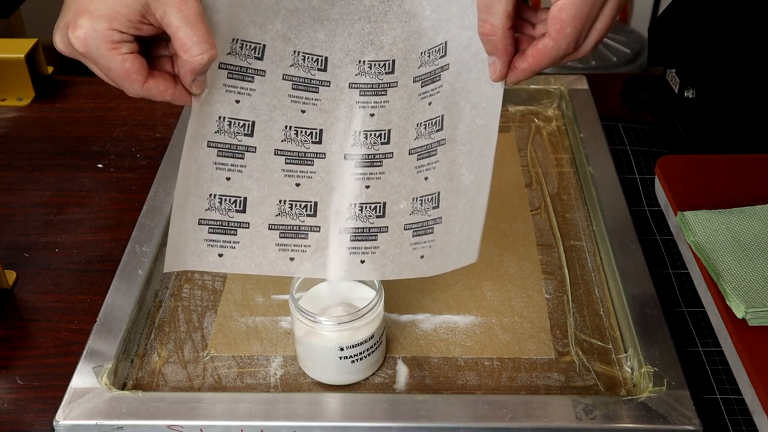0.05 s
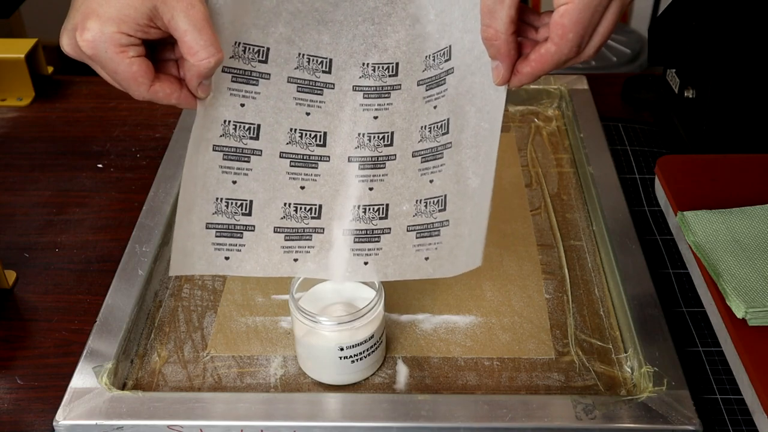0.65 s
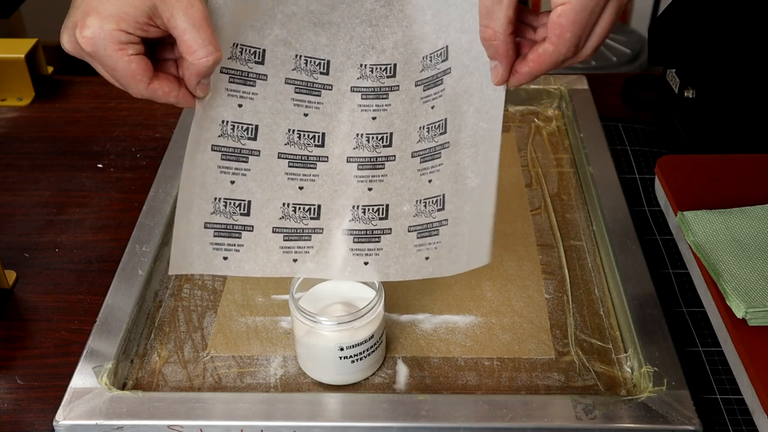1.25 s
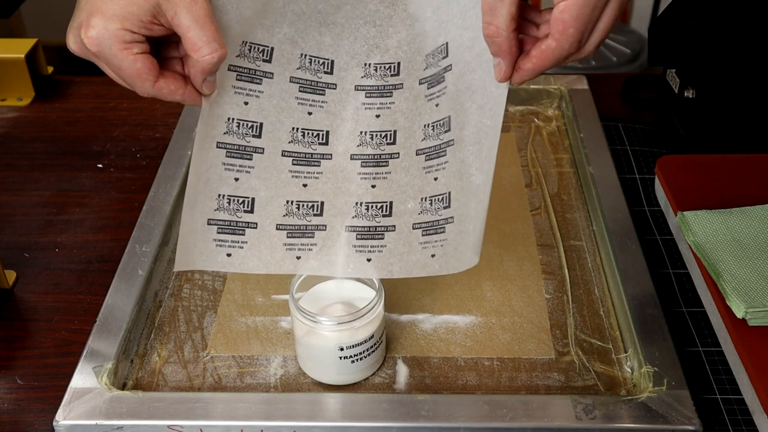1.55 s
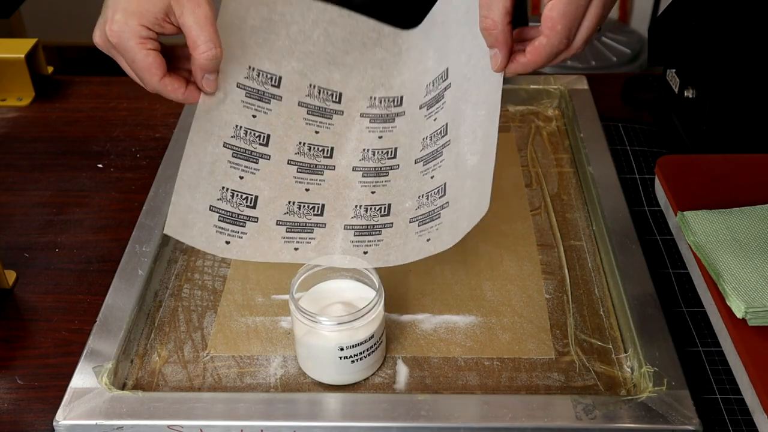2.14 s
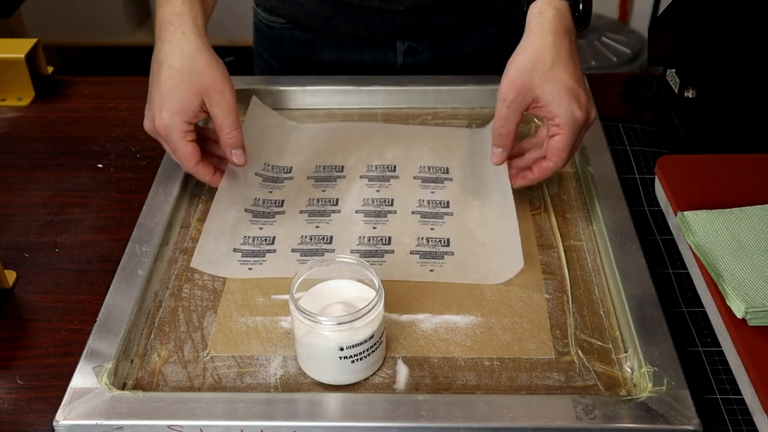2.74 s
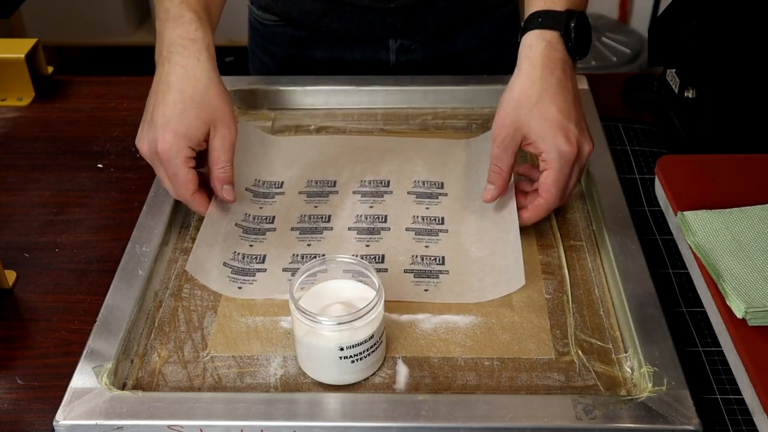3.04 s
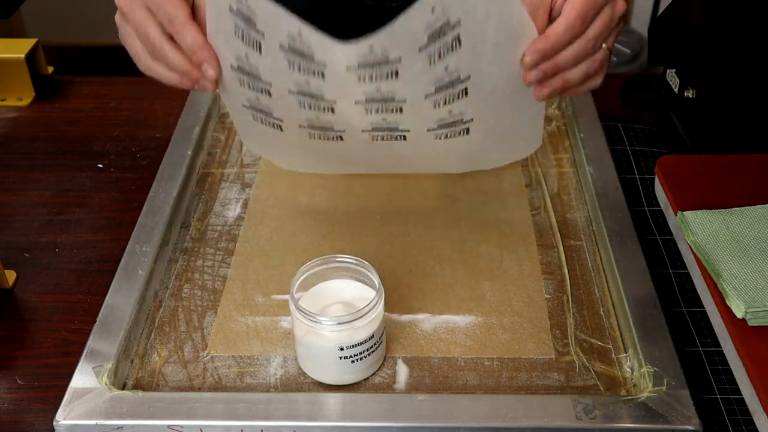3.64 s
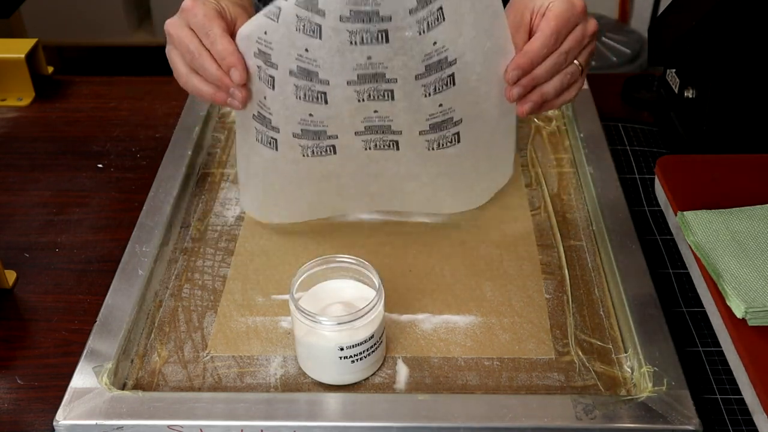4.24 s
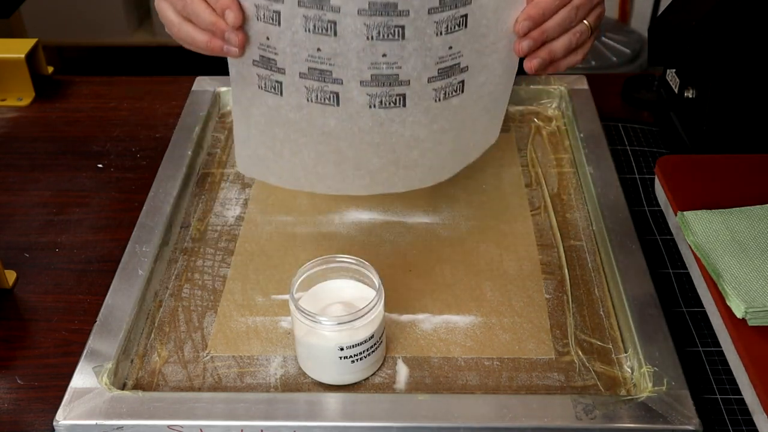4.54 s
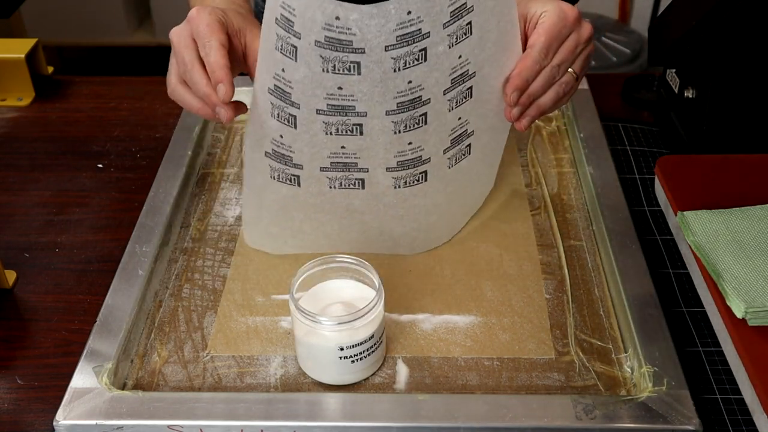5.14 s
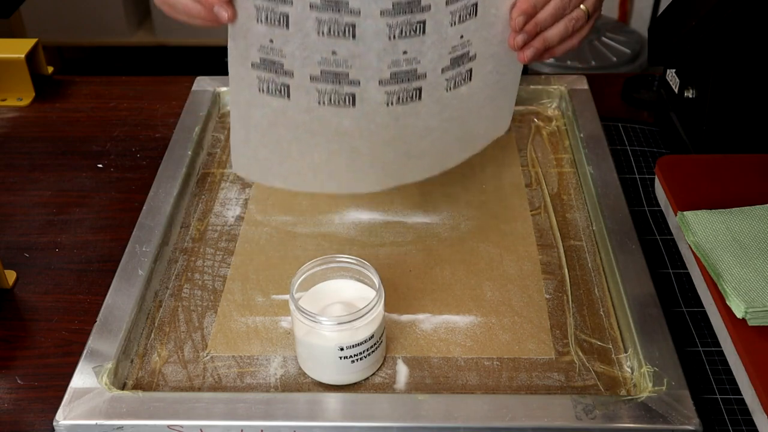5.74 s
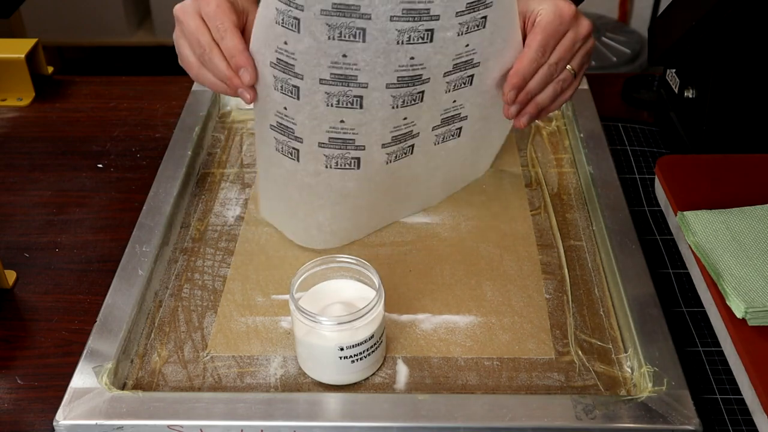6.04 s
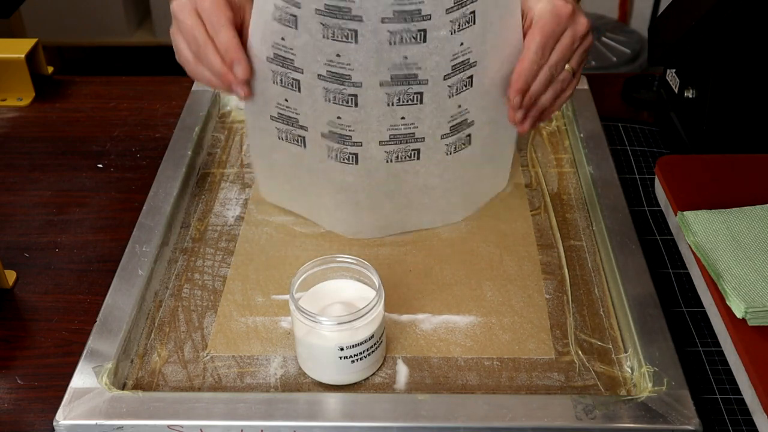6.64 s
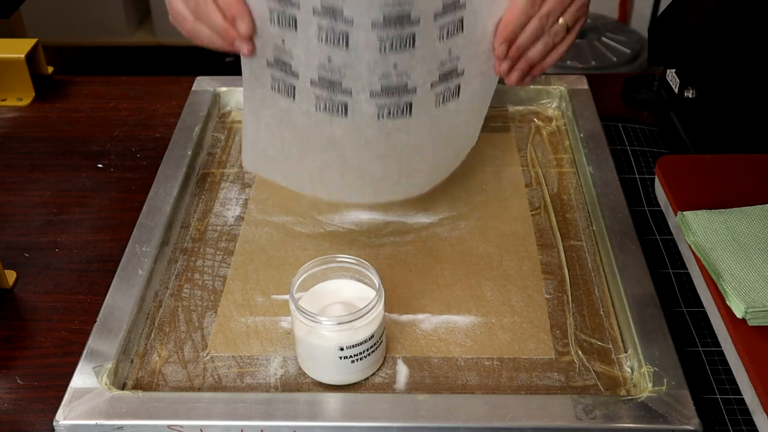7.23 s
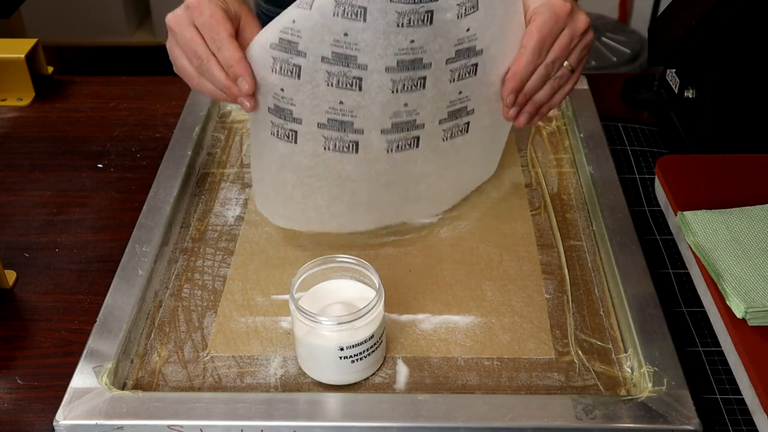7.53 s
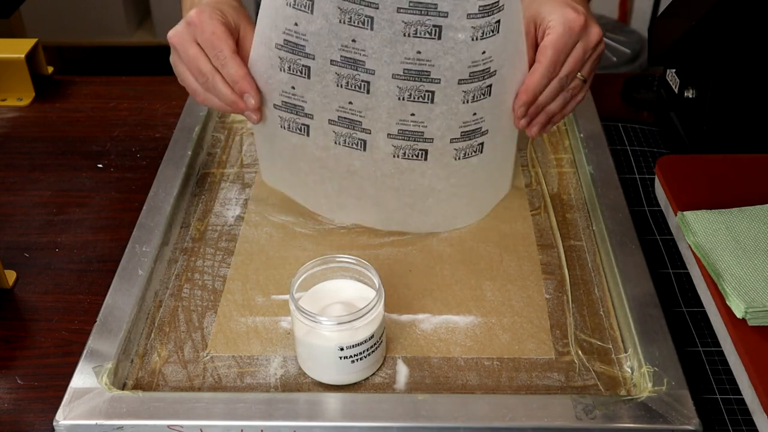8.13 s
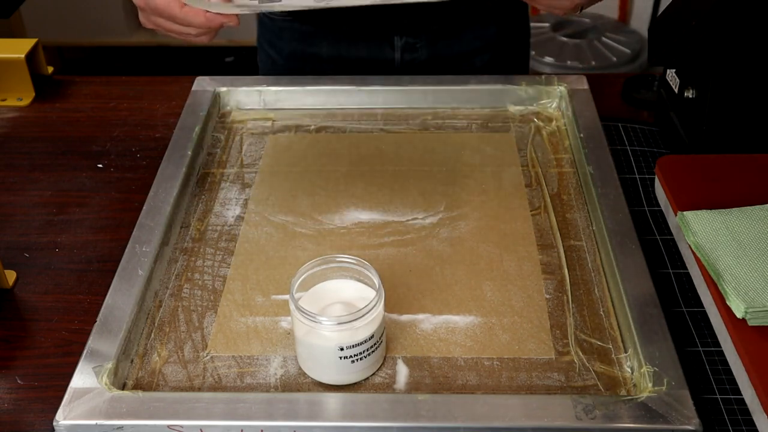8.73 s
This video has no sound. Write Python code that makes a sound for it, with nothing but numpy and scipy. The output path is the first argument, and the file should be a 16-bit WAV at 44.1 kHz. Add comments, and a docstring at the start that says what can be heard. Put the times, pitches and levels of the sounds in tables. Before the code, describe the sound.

A stiff sheet of paper is jiggled rapidly, making soft flutters and small ticks. It settles into quiet rustling and crinkling, with a faint hiss of powder sliding across it. Then the sheet is snapped taut six times, each a sharp crack with a springy flap after it, and a light rustle finishes. The sound is close and nearly mono in a small, quiet room.

```python
"""Shaking powder off paper

A stiff sheet is jiggled over a plastic jar in a small workroom, heard close and nearly mono. It is
lowered, the last powder hisses across it, and it is snapped taut six times to shake it clean.
Buckling makes the flaps, ticks and cracks, sliding friction the hiss; the room answers each snap."""
import sys
import numpy as np
from scipy import signal
from scipy.io import wavfile
from scipy.ndimage import uniform_filter1d

SR = 44100
rng = np.random.default_rng(int(sys.argv[2]) if len(sys.argv) > 2 else 0)


def wav_out(sig):
    """Save sig, one row per channel (or a flat mono array), as 16-bit PCM at SR to the path in sys.argv[1]."""
    wavfile.write(sys.argv[1], SR, np.round(np.clip(np.atleast_2d(sig).T, -1, 1) * 32767).astype(np.int16))


N = 391604
TIME = np.arange(N) / SR


def amp(db):
    """Decibels to amplitude ratio."""
    return 10 ** (np.asarray(db) / 20)


def unit(x):
    """Normalisation to rms 1."""
    return x / np.sqrt(np.mean(x ** 2) + 1e-20)


def read(points, hz):
    """Interpolation on a log-frequency axis."""
    f, value = np.transpose(points)
    return np.interp(np.log(hz + 1), np.log(f + 1), value)


def follow(curve):
    """Amplitude envelope from (time_s, level_db) points, silent outside them."""
    s, db = np.transpose(curve)
    return amp(np.interp(TIME, s, db)) * (TIME >= s[0]) * (TIME <= s[-1])


def add(mix, start_s, sound):
    """Superposition of a sound on the mix."""
    part = mix[max(round(start_s * SR), 0):][:len(sound)]
    part += sound[:len(part)]


def coloured(x, colour, tilt=None, size=4096):
    """Minimum-phase filtering by a spectrum of unit energy, times an optional tilt."""
    hz = abs(np.fft.fftfreq(size, 1 / SR))
    gain = unit(amp(np.maximum(read(colour, hz), -90)))
    if tilt is not None:
        gain = gain * amp(read(tilt, hz))
    log_response = np.conj(signal.hilbert(np.log(gain)))
    taps = np.fft.ifft(np.exp(log_response)).real
    return signal.oaconvolve(x, taps[:size // 2])[:len(x)]


def crispness(db):
    """Spectral tilt: the tighter a buckle, the more its highest frequencies gain."""
    return [(2600, 0.02), (7500, db), (12000, 2.27 * db)]


def crackle(size, per_s, spread_db, smooth):
    """Shot noise: random impulses of uneven size over a share of smooth friction noise, rms 1."""
    sizes = amp(spread_db * np.minimum(rng.exponential(1, size), 4))
    clicks = sizes * rng.choice([-1, 1], size) * (rng.random(size) < per_s / SR)
    return unit(unit(clicks) + smooth * rng.standard_normal(size))


def wander(per_s):
    """Random modulation, rms 1."""
    knots = np.arange(0, TIME[-1] + 1, 1 / max(per_s, 1))
    return unit(np.interp(TIME, knots, rng.standard_normal(N)[:len(knots)]))


def swell(rise_s, t60_s, size=18000):
    """Damped transient: a smooth rise and an exponential decay."""
    t = np.arange(size) / SR
    return (1 - np.exp(-(t / rise_s) ** 2)) * amp(-60 * t / max(t60_s, .003))


# Spectrum of the slack sheet: frequency_hz, gain_db
FLAP_SPECTRUM = [(70, -38), (150, -20.5), (300, -5.5), (500, -5.5), (700, -2.5), (1000, -8), (2000, -0.5),
                 (3200, -2.5), (5200, -7.5), (8500, -17.5), (10500, -29), (15500, -39.5)]
def flap(treble_db, t60_s, rise_s):
    """Buckling: the slack sheet flips over in a short, soft shower of impulses."""
    shape = swell(rise_s, t60_s)
    shower = shape * crackle(len(shape), per_s=2000, spread_db=2.5, smooth=0.76)
    return coloured(shower, FLAP_SPECTRUM, crispness(treble_db + 17))


# Bouts of shaking: start_s, end_s, period_s
JIGGLE_BOUTS = [(-.002, .85, .112), (.897, 1.75, .1184)]
# The three flips in a stroke: delay_s, gain_db, treble_db
STROKE_FLIPS = [(0.001, 0, -27), (.033, -3.5, -26), (.057, -2.5, -27)]
# Strength of the shaking: time_s, level_db
JIGGLE_EFFORT = [(0, -45), (.12, -35.5), (.25, -32.5), (.41, -39.5), (.52, -32.5), (.66, -38.5), (.92, -34),
                 (1.15, -36), (1.42, -37.5), (1.6, -33), (1.76, -39.5), (1.97, -44.5)]
def jiggling(gain_db=-2, uneven_db=0.8, lead_s=.003):
    """Forced vibration: the hands drive the sheet about nine times a second, flipping it in a pattern."""
    out = np.zeros(N)
    for stroke_s in np.concatenate([np.arange(*bout) for bout in JIGGLE_BOUTS]):
        for delay_s, flip_db, treble_db in STROKE_FLIPS:
            s = stroke_s + delay_s
            effort_db = np.interp(s, *np.transpose(JIGGLE_EFFORT))
            db = effort_db + flip_db - uneven_db * rng.standard_normal()
            add(out, s - lead_s, amp(db + gain_db) * flap(treble_db, t60_s=0.061, rise_s=0.0042))
    return out


# Slow bends of the sheet: centre_s, length_s, rustle_db, wobble_db, ticks_db
SLOW_BENDS = [(2.327, 0.25, -61, -74, -72), (2.953, 0.14, -60, -61, -85), (3.5, 0.21, -61, -55.5, -80),
              (3.798, 0.58, -66, -64, -93), (4.425, 0.28, -58.5, -55, -80), (5.07, 0.42, -60, -60.5, -61.5),
              (5.512, 0.19, -68, -52.5, -64), (5.997, 0.053, -57.5, -55, -53.5),
              (7.224, 0.14, -55.5, -55, -65.5), (8.19, 0.4, -54.5, -58.5, -57),
              (8.608, 0.15, -53, -61, -59.5), (8.782, 0.41, -63, -69, -78)]
def motion(bend_levels, jiggle_db, billow_db, held_db):
    """Incoherent sum: jiggling, holding, billowing after snaps and bending add in power to one gain."""
    power = (amp(jiggle_db) * follow(JIGGLE_EFFORT)) ** 2 + amp(held_db) ** 2
    billow = swell(rise_s=0.11, t60_s=0.62, size=SR)
    for s, *_ in TAUT_SNAPS:
        add(power, s, (amp(billow_db) * billow / billow.max()) ** 2)
    for (s, length_s, *_), db in zip(SLOW_BENDS, bend_levels):
        power += (amp(db) * np.exp(-(2 * (TIME - s) / length_s) ** 2)) ** 2
    return np.sqrt(power)


# Spectrum of bending paper: frequency_hz, gain_db
RUSTLE_SPECTRUM = [(80, -28), (150, -26.5), (300, -1.5), (450, -2), (700, 9.5), (1000, 4), (1400, 11.5),
                   (2000, 7.5), (3200, 1), (5000, -10.5), (8500, -37.5), (11000, -41), (16000, -52.5)]
def rustle(gain_db=-4, flutter_db=2):
    """Fine buckling and friction: a clumped crackle while the sheet bends."""
    grains = crackle(N, per_s=1200, spread_db=3, smooth=0.93) * amp(flutter_db * wander(per_s=54))
    drive = motion([db for _, _, db, _, _ in SLOW_BENDS], jiggle_db=-17, billow_db=-48, held_db=-69)
    return amp(gain_db) * drive * coloured(unit(grains), RUSTLE_SPECTRUM)


# Spectrum of the bowing sheet: frequency_hz, gain_db
FLEX_SPECTRUM = [(70, -22), (150, -12), (230, -1.5), (330, 6.5), (480, -9.5), (700, -1), (1200, -20),
                 (3000, -47), (16000, -70)]
def flexing(gain_db=-6, wobble_db=2.5):
    """Flexural radiation: the whole sheet bows and stirs the air with a soft, hollow wobble."""
    wobble = amp(gain_db + wobble_db * wander(per_s=55))
    drive = motion([db for *_, db, _ in SLOW_BENDS], jiggle_db=-24.5, billow_db=-52, held_db=-81.5)
    return drive * wobble * coloured(rng.standard_normal(N), FLEX_SPECTRUM)


# Spectrum of a crease: frequency_hz, gain_db
CREASE_SPECTRUM = [(150, -36), (500, -4), (1200, 1), (2200, 4.5), (2800, 5), (3500, 5), (4600, 2),
                   (6000, 0), (9000, -3), (10500, -18), (15500, -25)]
def crinkle(gain_db=-5):
    """Impulse excitation: small creases tick and ring briefly as the fingers work the sheet."""
    clicks = crackle(N, per_s=180, spread_db=10, smooth=0)
    ringing = signal.oaconvolve(abs(clicks), swell(rise_s=0.00027, t60_s=0.014, size=1500))[:N]
    ticks = unit(ringing * rng.standard_normal(N))
    drive = motion([db for *_, db in SLOW_BENDS], jiggle_db=-39, billow_db=-66, held_db=-88)
    return amp(gain_db) * drive * coloured(ticks, CREASE_SPECTRUM)


# The last powder crossing the sheet: time_s, level_db
POWDER_SLIDE = [(2.62, -99), (2.72, -61), (2.78, -63), (2.85, -69), (2.95, -67.5), (3.06, -70), (3.16, -77),
                (3.29, -80), (3.39, -68), (3.5, -90)]
# Spectrum of skidding grains: frequency_hz, gain_db
POWDER_SPECTRUM = [(500, -35), (1500, -14), (3500, 15), (6000, 10), (7500, 5), (9000, 6), (10500, -5),
                   (14000, -3), (16000, -19)]
def powder(gain_db=-4, trickle_db=-47):
    """Sliding friction: grains trickle while the sheet is jiggled and hiss when it is laid flat."""
    grains = crackle(N, per_s=5000, spread_db=3, smooth=.8)
    flow = follow(POWDER_SLIDE) + amp(trickle_db) * follow(JIGGLE_EFFORT)
    return amp(gain_db) * flow * coloured(grains, POWDER_SPECTRUM)


# Spectra of room air and of rumble: frequency_hz, gain_db
AIR_SPECTRUM = [(50, -21.5), (125, -7.5), (200, 1), (300, 3), (500, -2.5), (750, -2.5), (1100, -7.5),
                (1700, -13), (3000, -19.5), (5000, -28), (8000, -36.5), (15500, -35)]
RUMBLE_SPECTRUM = [(10, -9.5), (26, -0.5), (48, -15.5), (70, -20), (110, -29.5), (300, -25), (1000, -36.5),
                   (4000, -52), (16000, -68)]
def background(air_db=-67.5, rumble_db=-62, side_db=-4, drift_db=3):
    """Ambient noise: soft air in the middle, and a drifting rumble partly coherent between the ears."""
    air = amp(air_db) * coloured(rng.standard_normal(N), AIR_SPECTRUM)
    mid, side = (coloured(rng.standard_normal(N), RUMBLE_SPECTRUM, size=16384) for _ in range(2))
    rumble = mid + amp(side_db) * np.array([side, -side])
    return air + amp(rumble_db + drift_db * wander(per_s=3.7)) * rumble


# Flips of the slack sheet: start_s, level_db, treble_db, t60_s
SINGLE_FLAPS = [(.053, -36.5, -27, 0.05), (.222, -35.5, -18, 0.04), (.483, -36.5, -22, 0.072),
                (.734, -41, -21, 0.073), (1.02, -43, -40, 0.17), (1.327, -38, -31, 0.1),
                (1.365, -38, -24, 0.1), (1.378, -30, -18.5, 0.042), (1.518, -39, -21, .1),
                (1.606, -35.5, -19, 0.1), (1.725, -33.5, -18.5, 0.059), (3.491, -37.5, -29, 0.06),
                (4.114, -25.5, -13, 0.083), (4.453, -54, -61, 0.041), (4.939, -35, -19, 0.044),
                (5.045, -50, -20, 0.15), (5.433, -32, -15, 0.05), (5.503, -40, -30, 0.099),
                (6.303, -34, -20, 0.038), (6.918, -37.5, -34, 0.18), (6.949, -39, -19.5, 0.093),
                (7.19, -34.5, -30, 0.051), (7.214, -35.5, -30, 0.065), (7.698, -45, -33, 0.071),
                (8.123, -26.5, -39, 0.038), (8.294, -39, -33, 0.089), (8.545, -56, -12, 0.047),
                (8.617, -43, -22, 0.15)]
def flaps(gain_db=-2, lead_s=.003):
    """Buckling transients: the sheet flips as it is swung and gripped."""
    out = np.zeros(N)
    for s, db, treble_db, t60_s in SINGLE_FLAPS:
        add(out, s - lead_s, amp(db + gain_db) * flap(treble_db, t60_s, rise_s=0.0046))
    return out


# Single creases giving way: start_s, level_db, treble_db
CREASE_POPS = [(.1125, -42.5, -12.5), (0.5604, -39, -18), (.678, -41.5, -27.5), (1.484, -38.5, -35),
               (1.966, -48.5, -10.5), (2.174, -51.5, -25), (2.2424, -50, -17.5), (2.3034, -53, -24),
               (2.3486, -49, -29), (2.758, -45.5, -13.5), (2.7693, -50, -7), (2.778, -46, -10.5),
               (2.795, -47.5, -12), (3.142, -41.5, -17), (3.1567, -41.5, -14), (3.1709, -47, -11),
               (3.2133, -45.5, -10.5), (3.3323, -59.5, -5), (3.4218, -61.5, -6.5), (4.2556, -41, -8),
               (4.3165, -47, -8), (4.4101, -45, -14.5), (4.43, -36, -13), (4.619, -48, -21),
               (4.655, -49, -23), (4.9602, -46.5, -6), (5.152, -56, -8), (5.1962, -53, -19),
               (5.393, -47, -24), (5.5196, -44.5, -14.5), (5.5835, -38, -16.5), (6.1997, -39, -7.5),
               (7.314, -45.5, -22), (8.3637, -50, -22), (8.7188, -47, -25)]
def creases(gain_db=3, click_db=12, lead_s=0.00026):
    """Snap-through instability: one buckle pops with a sharp click and rings briefly in the paper."""
    out = np.zeros(N)
    shape = swell(rise_s=0.0012, t60_s=0.022, size=3000)
    for s, db, treble_db in CREASE_POPS:
        pop = shape * rng.standard_normal(len(shape))
        pop[shape.argmax()] += amp(click_db)
        pop = coloured(pop, CREASE_SPECTRUM, crispness(treble_db + 10))
        add(out, s - lead_s, amp(db + gain_db) * pop)
    return out


# Pushes of air: centre_s, peak_db, pitch_hz, length_s, left_minus_right_db
AIR_PUSHES = [(0.746, -54, 44.7, 0.038, -5), (2.487, -59, 45, .029, 0), (4.09, -52.5, 116, .11, -10),
              (5.993, -49, 40, 0.052, 0), (6.714, -51, 114, 0.12, 0), (7.365, -43, 160, 0.066, 1),
              (7.383, -55, 103, 0.15, 0), (7.387, -49, 45, .09, -6), (7.837, -44, 44.6, 0.068, -11)]
def gusts():
    """Near-field pressure: the swinging sheet pushes slow pulses of air, some harder to one side."""
    out = np.zeros((2, N))
    for s, db, hz, length_s, pan_db in AIR_PUSHES:
        t = np.arange(-length_s / 2, length_s / 2, 1 / SR)
        pulse = np.hanning(len(t)) * np.cos(2 * np.pi * hz * t)
        for channel, side_db in zip(out, (pan_db / 2, -pan_db / 2)):
            add(channel, s - length_s / 2, amp(db + side_db) * pulse)
    return out


# Spectrum of the taut sheet: frequency_hz, gain_db
SNAP_SPECTRUM = [(41, -34.5), (70, -20), (135, 0), (213, 1), (300, 4.5), (462, -10), (711, -0.5),
                 (934, -1.5), (1120, 1), (1470, -0.5), (2660, -2), (8470, -7), (10600, -15), (13300, -16),
                 (16000, -27)]
def whip_crack(crack_db, sizzle_db, thump_db, t60_s):
    """Travelling wave: a whip down the sheet sets off dense buckles, and it thumps like a membrane."""
    shape = swell(0.0034, t60_s) + amp(3) * swell(0.0038, t60_s=0.036)  # the crack leads
    shower = shape * crackle(len(shape), per_s=6700, spread_db=-0.5, smooth=1.16)
    dull = signal.filtfilt(*signal.butter(2, 4500, fs=SR), shower)
    fine = (shower - dull) * swell(rise_s=0.0094, t60_s=1.0)  # the finest buckles build up later
    tilt = [(180, thump_db + 20), (450, 0.0074), (1100, 0.0011),
            (2200, crack_db + 11), (4000, crack_db + 11), (9000, sizzle_db + 13)]
    return coloured(dull + fine, SNAP_SPECTRUM, tilt)


def hollow(x, hz, gain_db=-0.5, width_hz=120):
    """Resonance: the bowed sheet rings hollow at a pitch set by its curve."""
    return x + amp(gain_db) * signal.lfilter(*signal.iirpeak(hz, hz / width_hz, fs=SR), x)


# The sheet pulled taut: start_s, level_db, crack_db, sizzle_db, thump_db, t60_s, hollow_hz,
# surge_delay_s, surge_db, rebound_delay_s, rebound_db, treble_db (of surge and rebound)
TAUT_SNAPS = [(4.058, -31, -17.5, -17.5, -37, 0.19, 710, 0.021, -34.5, .184, -32.5, 3.5),
              (4.7, -34, -11.5, -12, -31, 0.23, 1860, .03, -47, 0.11, -30.5, 0),
              (6.026, -34.5, -10, -11.5, -26, 0.29, 1300, .025, -45, 0.13, -37.5, 0),
              (6.682, -36.5, -11, -12, -22.5, 0.36, 740, .046, -36.5, 0.16, -36, -1),
              (7.345, -31, -13.5, -17, -27.5, 0.38, 1050, 0.045, -39.5, .145, -36.5, -3.5),
              (7.988, -37, -9.5, -13.5, -23, 0.45, 840, 0.029, -62, 0.11, -32.5, -1.5)]
def snaps(gain_db=2, lead_s=.003):
    """Sudden tension: the sheet cracks, then surges again as its far edge pulls taut."""
    out = np.zeros(N)
    for s, db, crack, sizzle, thump, t60_s, hollow_hz, delay_s, surge_db, _, _, treble in TAUT_SNAPS:
        first = whip_crack(crack, sizzle, thump, t60_s)
        surge = whip_crack(crack_db=-9, sizzle_db=treble - 10, thump_db=-22.5, t60_s=0.1367)
        add(out, s - lead_s, amp(db + gain_db) * hollow(first, hollow_hz))
        add(out, s - lead_s + delay_s, amp(surge_db + gain_db) * surge)
    return out


# Spectrum of landing powder: frequency_hz, gain_db
SPRAY_SPECTRUM = [(500, -28), (2000, 11), (5000, 3), (9000, -2), (10500, -8.5), (14000, -6), (16000, -19)]
def spray(first_db=-47, loss_db=14.5, fall_s=0.14, length_s=0.086):
    """Granular impact: each snap flings powder onto the table and leaves less for the next."""
    landing = sum(amp(first_db - k * loss_db) * np.exp(-(2 * (TIME - s - fall_s) / length_s) ** 2)
                  for k, (s, *_) in enumerate(TAUT_SNAPS))
    return landing * coloured(crackle(N, per_s=3600, spread_db=5, smooth=.6), SPRAY_SPECTRUM)


def rebounds(gain_db=-3, lead_s=.003):
    """Elastic recoil: the sheet springs back after each snap with one bright flap."""
    out = np.zeros(N)
    for s, *_, delay_s, db, treble_db in TAUT_SNAPS:
        recoil = flap(treble_db - 12.5, t60_s=0.16, rise_s=0.01)
        add(out, s + delay_s - lead_s, amp(db + gain_db) * recoil)
    return out


# Echoes off nearby surfaces: delay_s, gain_db
EARLY_ECHOES = [(.0017, -28), (.0041, -40), (.0073, -19.5), (0.01, -16.5), (0.0184, -12.5), (.0243, -20)]
def nearby(x):
    """Early reflection: the table, the frame and the person holding the sheet return the first echoes."""
    out = x.copy()
    for delay_s, db in EARLY_ECHOES:
        add(out, delay_s, amp(db) * x)
    return out / np.sqrt(1 + sum(amp(db) ** 2 for _, db in EARLY_ECHOES))


# Reverberation time: frequency_hz, t60_s
REVERB_TIME = [(150, 0.4), (500, 0.45), (2000, 0.28), (5000, 0.37), (8000, 0.36), (11000, 0.28),
               (15000, 0.22)]
# Strength of the diffuse tail: frequency_hz, gain_db
REVERB_GAIN = [(150, -6), (1000, -2.5), (4000, -4.5), (9000, -4.5), (15000, -11)]
# Standing waves of the room: pitch_hz, level_db, t60_s
STANDING_WAVES = [(119.5, -48, 0.25), (169.5, -56, 0.24), (212.6, -58.5, 0.39), (337.5, -65, 0.71)]
def room(x, delay_s=.005, size=256):
    """Reverberation: each band stores energy and releases it as a diffuse tail; low modes ring on."""
    hz, _, spectra = signal.stft(x, SR, nperseg=size)
    retained = amp(-60 * (size / 2 / SR) / read(REVERB_TIME, hz)) ** 2  # energy share left per hop
    power = abs(uniform_filter1d(abs(spectra) ** 2, size=3, axis=0))
    stored = np.array([signal.lfilter([1 - k], [1, -k], p) for k, p in zip(retained, power)])
    noise = signal.stft(rng.standard_normal(N), SR, nperseg=size)[2]
    diffuse = noise / np.std(noise) * np.sqrt(stored) * amp(read(REVERB_GAIN, hz))[:, None]
    tail = signal.istft(diffuse, SR, nperseg=size)[1]
    t = TIME[:SR]
    modes = sum(amp(db - 60 * t / t60) * np.sin(2 * np.pi * f * t) for f, db, t60 in STANDING_WAVES)
    wet = signal.fftconvolve(x, modes)[:N]
    add(wet, delay_s, signal.sosfilt(signal.butter(2, 120, "high", fs=SR, output="sos"), tail))
    return wet


def scene(tick_room_db=-3, jiggle_room_db=1.5):
    """Superposition of direct and reverberant sound; the small ticks are the driest."""
    sheet = nearby(snaps() + rustle() + flexing()) + rebounds() + flaps() + powder() + spray()
    strokes = jiggling()
    ticks = creases() + crinkle()
    reverb = room(sheet + amp(jiggle_room_db) * strokes + amp(tick_room_db) * ticks)
    return sheet + strokes + ticks + reverb + gusts() + background()


def record(dry, cutoff_hz=15900):
    """Band limiting: a steep low-pass filter removes the highest treble."""
    taps = signal.firwin(511, cutoff_hz, window=("kaiser", 9), fs=SR)
    return signal.oaconvolve(dry, taps[None], "same")


dry = scene()
out = record(dry)
wav_out(out)
```